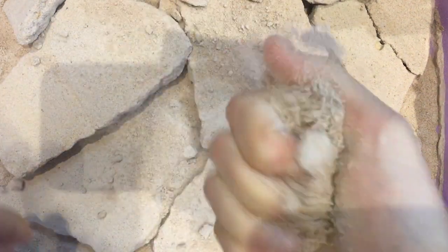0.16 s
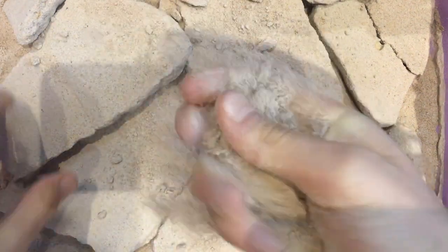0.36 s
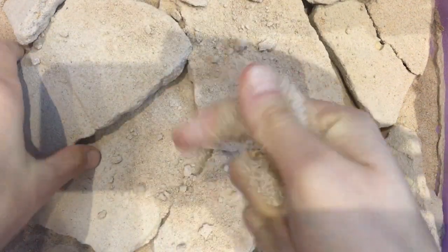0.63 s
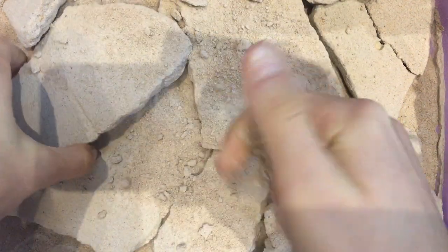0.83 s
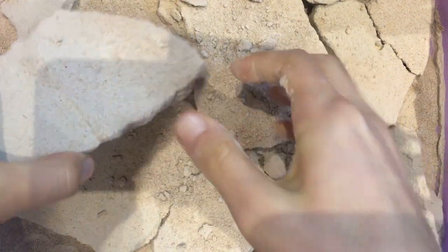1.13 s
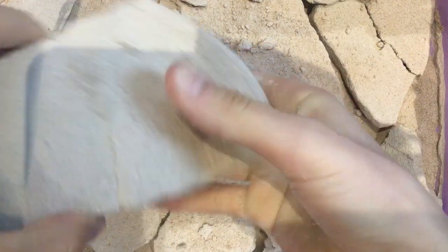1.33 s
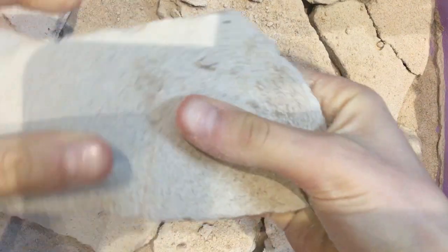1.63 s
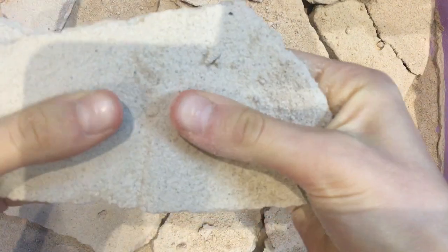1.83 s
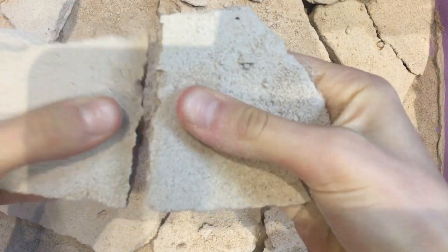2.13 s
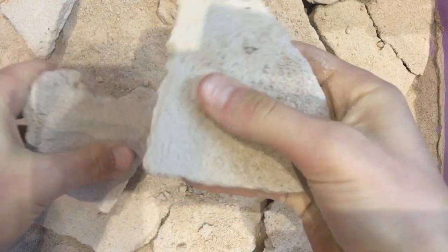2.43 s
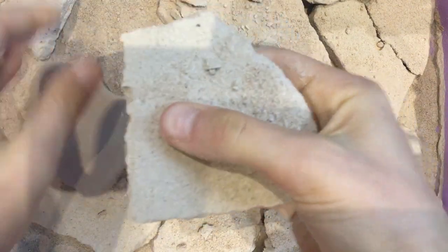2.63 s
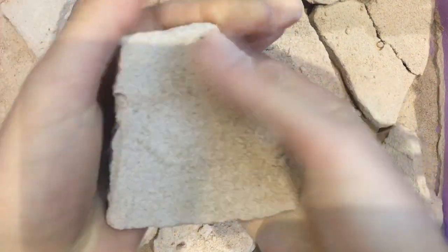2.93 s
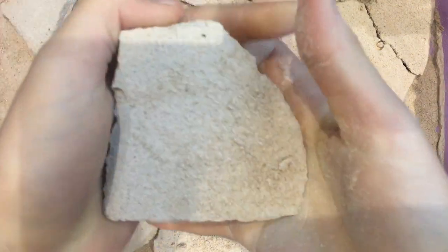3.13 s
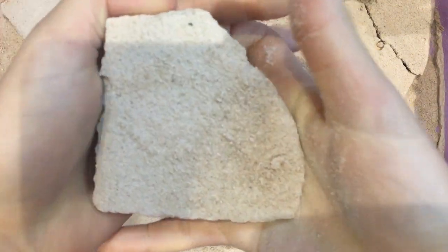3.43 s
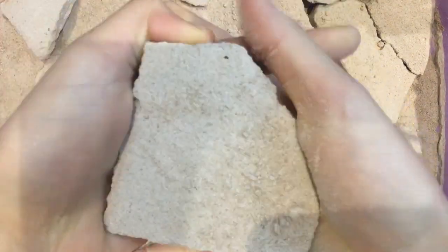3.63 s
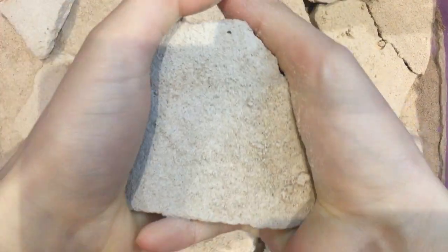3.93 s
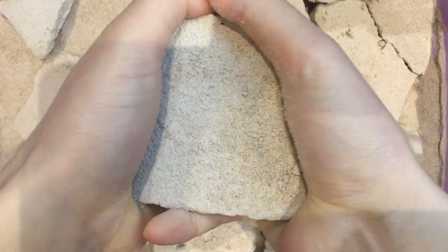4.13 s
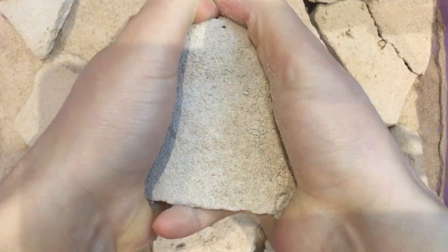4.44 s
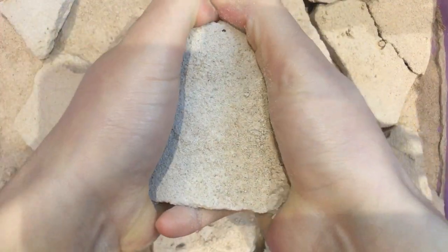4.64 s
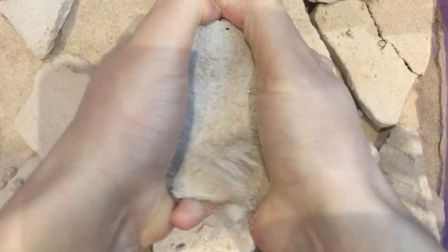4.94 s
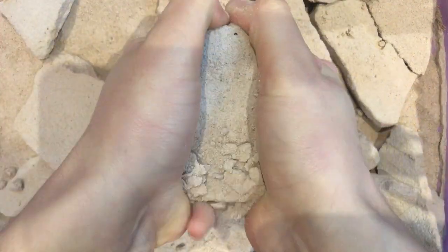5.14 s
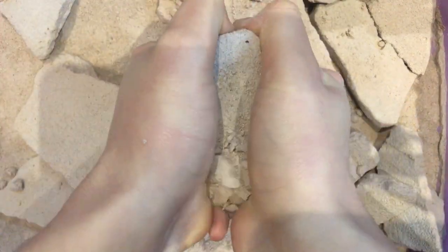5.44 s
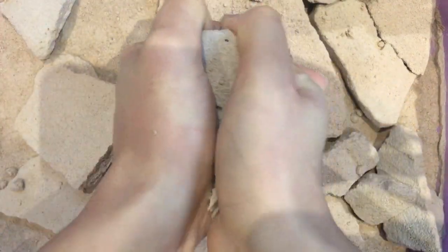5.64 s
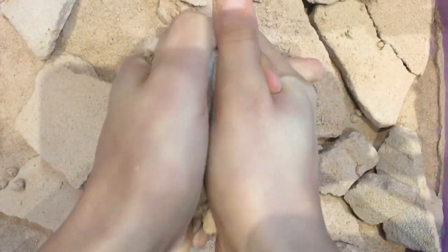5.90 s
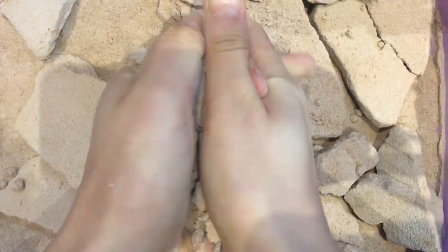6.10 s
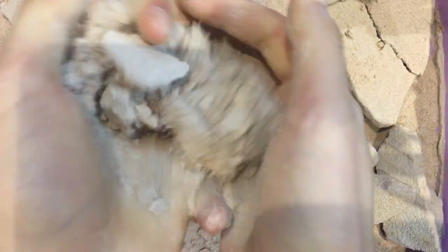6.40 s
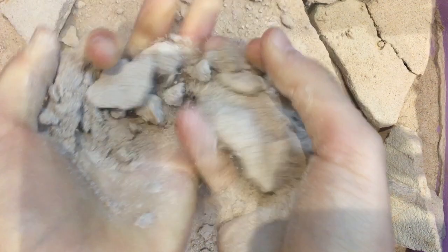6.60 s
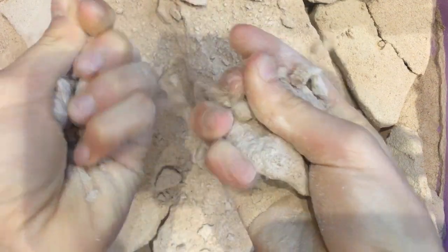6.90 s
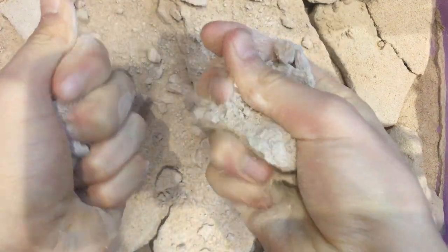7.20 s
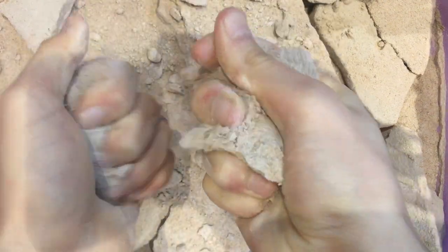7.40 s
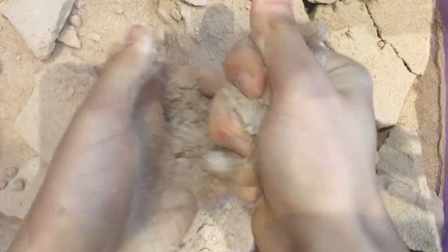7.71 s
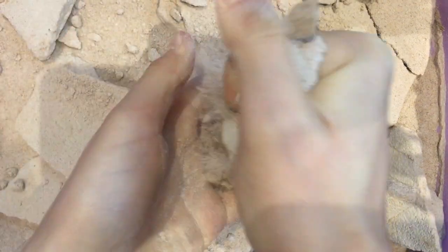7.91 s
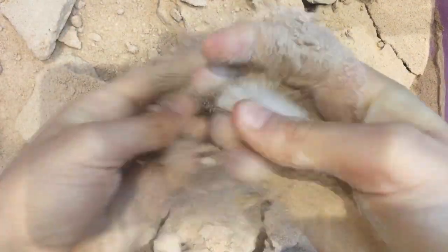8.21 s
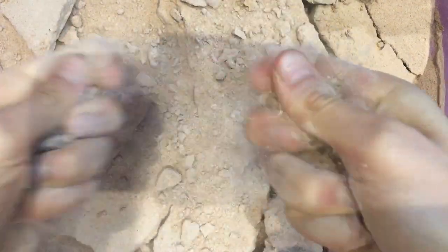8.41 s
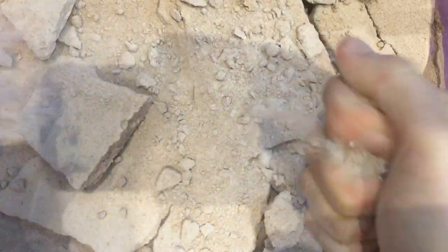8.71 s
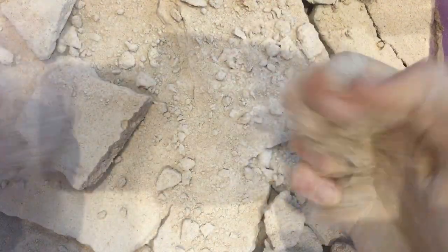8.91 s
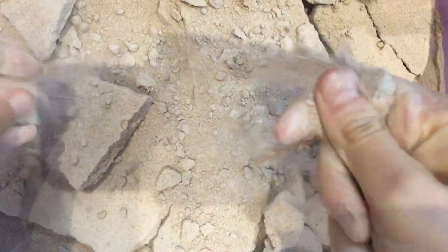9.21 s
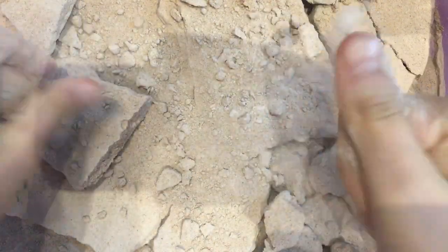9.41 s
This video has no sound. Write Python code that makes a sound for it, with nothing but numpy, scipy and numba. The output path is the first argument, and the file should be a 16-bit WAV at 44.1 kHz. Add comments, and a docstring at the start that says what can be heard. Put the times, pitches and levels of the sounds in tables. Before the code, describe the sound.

Bare hands snap and crush dry chalk slabs close up, with gritty crackles, powdery hiss, crunching clusters and hard lumps clacking onto the heap.

```python
"""A quiet place with a heap of flat chalk slabs: bare hands crush dry chalk close to the microphone.
Powder, grit and crumbs are random tiny fractures, coloured and shaped by each movement of the hands.
Cupped hands squeak as a gliding resonance and jolts thump at a falling pitch; lumps ring the heap's modes.
Snaps are short noise bursts; crunches are swelling avalanches of fractures that ring the hollow of the palms.
A low rumble wavers behind, and surfaces nearby add a faint, short reverberation."""
import sys
import numpy as np
from scipy import signal
from scipy.fft import rfft, irfft
from scipy.io import wavfile
from scipy.ndimage import uniform_filter1d
from numba import njit

SR = 44100
rng = np.random.default_rng(int(sys.argv[2]) if len(sys.argv) > 2 else 0)


def output_pcm(signal):
    """Save a mono or channel-first signal as 16-bit PCM at the path in sys.argv[1].

    Samples are clipped to [-1, 1] before scaling.
    """
    pcm = np.clip(np.atleast_2d(signal).T, -1, 1) * 32767
    wavfile.write(sys.argv[1], SR, np.round(pcm).astype(np.int16))


N = 421155
AGE = np.arange(SR // 4) / SR  # time since a blow, s


def undb(db):
    """Decibels to gain."""
    return 10 ** (np.asarray(db) / 20)


def unit(x):
    """Scale to rms 1."""
    return x / np.sqrt(np.mean(x ** 2))


def blow(x, db, size=176):
    """Scale a short sound so that its loudest 4 ms have this rms level."""
    power = uniform_filter1d(x ** 2, size, mode="constant")
    return x * undb(db) / np.sqrt(power.max())


def add(out, s, x):
    """Mix a short sound in at time s."""
    i = max(int(s * SR), 0)
    out[i:i + len(x)] += x[:max(N - i, 0)]


def colour(x, points, size=4096):
    """Causal minimum-phase filter with the given outline of (f/Hz, level/dB)."""
    hz, db = np.transpose(points)
    grid = np.maximum(np.fft.rfftfreq(size, 1 / SR), 1)
    outline_db = np.interp(np.log(grid), np.log(hz), db)
    # folding the cepstrum puts all of the response after the blow
    cepstrum = irfft(np.log(undb(outline_db)))
    cepstrum[1:size // 2] *= 2
    cepstrum[size // 2 + 1:] = 0
    response = irfft(np.exp(rfft(cepstrum)))
    return signal.fftconvolve(x, response)[:len(x)]


def walk(rate):
    """Slow chance: random levels, so many per second, joined by straight lines and scaled to rms 1."""
    steps = rng.standard_normal(N // 100)
    return unit(np.interp(np.arange(N) / SR * rate, np.arange(len(steps)), steps))


def curves(table):
    """The columns of a table of (t/s, ...) rows, sample by sample."""
    s, *columns = np.transpose(table)
    return [np.interp(np.arange(N) / SR, s, c) for c in columns]


def grains(rate, spread_db, size):
    """Tiny fractures at random moments, so many per second: many weak ones and a few strong ones."""
    hit = rng.random(size) < rate / SR
    strength = undb(spread_db * np.minimum(rng.exponential(size=size), 5))
    sign = rng.choice([-1, 1], size)
    return unit(hit * strength * sign + 1e-12)


def ring(hz, t60):
    """One struck mode, a sine that loses 60 dB in t60 seconds."""
    return np.sin(2 * np.pi * hz * AGE) * np.exp(-np.log(1000) * AGE / t60)


@njit
def resonate(x, hz, q):
    """Band-pass with a moving centre."""
    y, band, low = np.empty(len(x)), 0., 0.
    for i in range(len(x)):
        g = np.tan(np.pi * hz[i] / SR)
        v = (band + g * (x[i] - low)) / (1 + g * (g + 1 / q))
        band, low, y[i] = 2 * v - band, low + 2 * g * v, v
    return y


# tone of the quiet place: (f/Hz, level/dB)
AIR_COLOUR = [(20, -29), (35, -15.5), (52, -1), (90, -7), (200, -12), (330, -15), (550, -20), (1500, -29),
              (5000, -36.5), (15000, -51)]
AIR_DB = -71


def air():
    """A low, gently wavering background rumble with a trace of hiss: coloured noise."""
    waver_db = 1.4 * walk(rate=3.3)
    return unit(colour(rng.standard_normal(N), AIR_COLOUR)) * undb(AIR_DB + waver_db)


ROOM_T60_S, ROOM_DB = .26, -16.0206


def room(x):
    """A faint, short reverberation from the surfaces nearby: a decaying noise tail."""
    decay = np.exp(-np.log(1000) * AGE / ROOM_T60_S)
    tail = rng.standard_normal(len(AGE)) * decay * (AGE > .003)
    tail = colour(tail, [(100, -11.0), (400, -4.0), (1500, -6), (5000, -7.5), (15000, -8.5)])
    tail = tail / np.sqrt(np.sum(tail ** 2))
    return x + undb(ROOM_DB) * signal.fftconvolve(x, tail)[:N]


# every stroke builds up, eases as the chalk yields, and dies away
ATTACK_S, SAG_DB_PER_S, RELEASE_S = 0.013, 14.5, 0.025


def stroke(start, length, sag):
    """Gain of one movement of the hand: a rounded swell, a hold that sags by so many dB per s, a release."""
    age = np.arange(int((length + 8 * RELEASE_S) * SR)) / SR
    swell = 1 - np.exp(-(age / ATTACK_S) ** 2)
    release = np.exp(-np.maximum(age - length, 0) / RELEASE_S)
    gain = swell * undb(-sag * age) * release
    return np.pad(gain, (max(int(start * SR), 0), N))[:N]


def strokes(rows, sag=SAG_DB_PER_S):
    """Joint gain of movements given as (start t/s, length t/s, level/dB); they add in power."""
    return np.sqrt(sum((undb(db) * stroke(start, length, sag)) ** 2 for start, length, db in rows))


def ticks(pitches, rate, q):
    """Bits of chalk land at random moments, each size at its own pitch."""
    sizes = (resonate(grains(rate=rate, spread_db=0.5, size=N), np.full(N, 1. * hz), q) for hz in pitches)
    return unit(sum(sizes))


# loose chalk that keeps trickling between the strokes: (t/s, powder level/dB, grit level/dB)
TRICKLE_LEVELS = [(0, -63.5, -62.5), (.22, -64.5, -65), (.36, -72.5, -69.5), (.8, -67, -69.5),
                  (.88, -72.5, -71.5), (1.25, -78.5, -79.5), (1.7, -69.5, -75), (1.9, -83, -81),
                  (2.15, -78.5, -79), (3.2, -71.5, -84.5), (3.98, -76, -85), (4.9, -72, -80),
                  (5.7, -72.5, -70.5), (6.5, -63.5, -68), (7.5, -59.5, -78), (8.2, -66.5, -67),
                  (8.6, -60, -67), (9.05, -66, -62.5), (9.55, -57.5, -62.5)]
# a hand rubs or squeezes the chalk: (start t/s, length t/s, powder level/dB, grit level/dB)
HAND_RUBS = [(0.03, 0.19, -59, -81), (0.448, 0.069, -62, -74), (0.567, 0.18, -60.5, -66),
             (0.94, .11, -64.5, -62), (1.398, .11, -64.5, -68), (1.531, 0.091, -65.5, -70.5),
             (1.632, 0.021, -57, -63), (1.785, 0.029, -66, -75), (1.955, 0.053, -72, -77),
             (2.26, 0.032, -70, -82), (2.367, 0.091, -66.5, -73), (2.55, 0.072, -65, -78),
             (2.655, 0.015, -64, -67.5), (2.88, .12, -64.5, -75), (3.068, 0.035, -63, -76),
             (3.302, 0.03, -71, -71), (3.614, 0.035, -56, -69), (3.641, 0.029, -49, -62.5),
             (3.798, 0.066, -67, -81), (4.05, 0.12, -71, -84), (4.427, 0.025, -56.5, -64),
             (4.575, 0.058, -63, -76), (4.942, 0.11, -59, -59.5), (5.256, 0.25, -58.5, -61.5),
             (5.524, 0.059, -54.5, -49.5), (5.828, 0.12, -59.5, -59.5), (6.147, .035, -53.5, -65),
             (6.198, 0.044, -59, -61.5), (6.295, 0.071, -80, -62.5), (6.6, 0.41, -72, -68),
             (6.921, 0.14, -54, -55.5), (7.078, .08, -60, -63), (7.152, 0.14, -51, -54.5),
             (7.29, 0.24, -61, -58), (7.739, 0.16, -55, -54), (8.064, 0.012, -51.5, -62),
             (8.276, 0.051, -56, -60), (8.34, 0.11, -52.5, -56.5), (8.484, 0.26, -51.5, -57),
             (8.694, 0.055, -49, -56.5), (8.762, 0.13, -55.5, -66), (8.903, 0.045, -58.5, -61),
             (9.147, 0.11, -53, -58), (9.32, 0.11, -58, -75)]
# a handful of crumbs tumbles out: (start t/s, length t/s, level/dB)
CRUMB_SPILLS = [(0.0, 0.27, -63.5), (.39, 0.46, -66.5), (.945, .13, -57.5), (1.1, 0.36, -71.5),
                (2.55, 0.3, -71.5), (3.315, 0.018, -81), (5.86, .07, -67), (6.35, 0.031, -55.5),
                (6.59, .25, -63), (7.87, 0.11, -62), (8.26, 0.11, -57.5), (9.0, 0.045, -61)]
# tone of hissing powder, of crackling grit and of tumbling crumbs: (f/Hz, level/dB)
POWDER_COLOUR = [(1500, -46.5), (3000, -6.5), (4000, -1.5), (4800, -4), (6300, 0.5), (7300, -2), (9000, 2),
                 (10400, -3), (11800, -1), (13500, -4), (15600, -10)]
GRIT_COLOUR = [(400, -18), (780, -4.5), (1080, 5), (1500, 3.5), (1950, 4), (2450, 5.5), (2900, 0.5),
               (3700, 0.5), (5000, -6), (9000, -41.5)]
CRUMB_COLOUR = [(40, -22), (80, 3.5), (135, 6), (220, 5.5), (340, -1.5), (450, 2.5), (700, 0), (1050, -5),
                (1600, -20), (3000, -60)]
SHED_DB = -8.5  # crumbs that any rubbing sheds, relative to its grit


def grinding(stray_db=-7, clatter_db=-6, catch_db=3.0):
    """Chalk rubs on chalk and skin: powder hisses, grit crackles, crumbs tumble; all catch and slip together."""
    powder_db, grit_db = curves(TRICKLE_LEVELS)
    powder_gain = np.hypot(undb(powder_db), strokes((s, length, db) for s, length, db, _ in HAND_RUBS))
    grit_gain = np.hypot(undb(grit_db), strokes((s, length, db) for s, length, _, db in HAND_RUBS))
    crumb_gain = np.hypot(undb(SHED_DB) * grit_gain, strokes(CRUMB_SPILLS))
    # gritty rubbing catches and slips; skin on powder slides evenly
    grit_share = grit_gain / np.hypot(grit_gain, powder_gain)
    slip = undb(catch_db * walk(rate=60) * grit_share)
    fractures = grains(rate=1400, spread_db=5.5, size=N)
    dust = grains(rate=14000, spread_db=2.5, size=N)
    grit_grains = grains(rate=2000, spread_db=1.5, size=N)
    powder = unit(colour(dust + 0.4 * fractures, POWDER_COLOUR))
    grit = unit(colour(0.25 * fractures + grit_grains, GRIT_COLOUR))
    crumbs = unit(colour(grains(rate=450, spread_db=3.5, size=N), CRUMB_COLOUR))
    # stray bits tick on the slabs and bigger ones clatter
    grit = unit(grit + undb(stray_db) * ticks((1320, 2270, 3080, 6030), rate=12, q=5.2))
    crumbs = unit(crumbs + undb(clatter_db) * ticks((310, 435, 960, 1420), rate=14, q=9.3))
    return slip * (powder * powder_gain + grit * grit_gain + crumbs * crumb_gain)


# dry skin squeaks on the chalk, pitched by the hollow of the hands:
# (start t/s, length t/s, first f/Hz, last f/Hz, level/dB)
SKIN_SQUEAKS = [(0.51, .2, 1180, 1110, -71), (1.134, 0.32, 1380, 1490, -79), (3.35, 0.083, 1890, 1890, -79),
                (3.633, 0.041, 1800, 1720, -60.5), (4.304, 0.022, 1200, 1160, -71),
                (4.43, 0.044, 1150, 1140, -74), (4.588, .015, 1150, 1150, -69),
                (5.31, 0.086, 2210, 2320, -65), (6.298, .07, 2160, 1430, -66),
                (6.542, .39, 1335, 1280, -66.5), (8.485, 0.071, 2480, 2450, -56),
                (9.168, 0.053, 2510, 2480, -56)]
SQUEAK_Q, SQUEAK_WOBBLE, SQUEAK_FLUTTER_DB = 16., .015, 1.2  # wobble: rms share of the pitch


def squeaks(overtone=2.4, overtone_db=-8):
    """Cupped hands pick an unsteady, gliding pitch and its overtone out of the grit while the skin slides."""
    points = []
    for s, length, first_hz, last_hz, _ in SKIN_SQUEAKS:
        points += [(s, first_hz), (s + length, last_hz)]
    glide_hz, = curves(points)
    pitch = glide_hz * np.exp(SQUEAK_WOBBLE * walk(rate=25))
    grit = grains(rate=4000, spread_db=2.0, size=N)
    low = unit(resonate(colour(grit, GRIT_COLOUR), pitch, SQUEAK_Q))
    high = unit(resonate(grit, overtone * pitch, SQUEAK_Q))
    hollow = unit(low + undb(overtone_db) * high)
    gain = strokes([(s, length, db) for s, length, _, _, db in SKIN_SQUEAKS], sag=0)
    return hollow * undb(SQUEAK_FLUTTER_DB * walk(rate=36)) * gain


# dull jolts of hands and slab: (t/s, level/dB, f/Hz)
JOLTS = [(1.051, -56, 69), (1.944, -53.5, 67.6), (2.545, -50, 136.5), (2.732, -43, 131), (2.736, -42, 71),
         (2.771, -43.5, 62.4), (2.812, -43.5, 133), (4.61, -50.5, 55.7), (4.815, -41, 56.7),
         (4.966, -42.5, 59.3), (5.033, -42.5, 52.5), (5.082, -49, 59), (5.258, -45, 60.3),
         (5.28, -44.5, 60.7), (5.298, -46, 61), (5.532, -49, 111), (5.541, -43, 98), (5.582, -46.5, 55.6),
         (6.366, -52, 68), (6.72, -56.5, 81.5), (7.689, -52.5, 103), (8.409, -56, 89), (9.54, -52, 124)]
THUMP_T60_S_PER_HZ = 0.0014  # a firmer grip thumps higher and rings longer


def thumps(stiffening=3.23, relax_s=0.0018, flesh_db=-9, flesh_s=0.012):
    """Flesh stiffens under a jolt and relaxes, so each thump falls quickly to its pitch."""
    out = np.zeros(N)
    flesh_colour = [(40, -6), (130, 12), (280, -6), (600, -35.0), (2000, -44)]
    for s, db, hz in JOLTS:
        t60 = THUMP_T60_S_PER_HZ * hz
        turns = hz * (AGE + stiffening * relax_s * (1 - np.exp(-AGE / relax_s)))
        swing = np.sin(2 * np.pi * turns) * np.exp(-np.log(1000) * AGE / t60)
        flesh = colour(rng.standard_normal(len(AGE)) * np.exp(-AGE / flesh_s), flesh_colour)
        add(out, s - .0005, blow(swing, db) + blow(flesh, db + flesh_db))
    return out


# modes of the heap of slabs: (f/Hz, level/dB, t60 t/s)
SLAB_MODES = [(87, -3, 0.33), (152, -2, 0.13), (222.6, 1, 0.21), (301, 4.5, 0.039), (431.4, 11, 0.059),
              (507, 9.5, 0.027), (615, 5, 0.014), (637, 2, 0.069), (905, 8, 0.03), (1074, -3.5, 0.055),
              (1296, -4, 0.073), (1462, -7.5, 0.042), (1410, 0, 0.02), (1605, 11.5, 0.0097),
              (1705, -2, 0.07), (1985, 8, 0.03), (2185, -7, 0.022), (2760, 15, 0.0078), (3320, -8, 0.048),
              (3230, -6, 0.013), (3780, 7, 0.026), (4360, -5, 0.02)]


def heap(centre_hz, octaves):
    """The slabs ring in the modes near the pitch that a blow favours."""
    out = np.zeros(len(AGE))
    for k, (hz, db, t60) in enumerate(SLAB_MODES):
        nearness = np.exp(-(np.log2(hz / centre_hz) / octaves) ** 2 / 2)
        out += (-1) ** k * undb(db) * nearness * ring(hz, t60)
    return out


# lumps land on the slabs: (t/s, clack level/dB, thud level/dB, thud f/Hz, clack f/Hz, contact decay t/s)
LUMP_KNOCKS = [(0.034, -37, -49.5, 483, 1500, 0.0022), (0.0706, -51, -71, 150, 1378, 0.003),
               (0.3972, -59, -57.5, 430, 899, 0.0037), (0.4842, -54, -61, 480, 1070, 0.003),
               (0.5353, -41, -78, 480, 1610, 0.0015), (0.9213, -51, -56, 147, 1810, 0.0023),
               (0.9705, -59, -52.5, 441, 1162, 0.003), (1.0132, -63, -52, 425, 1480, 0.0038),
               (6.492, -54, -68, 161, 1410, 0.0048), (6.6653, -54, -62, 242, 2336, 0.0027),
               (6.7424, -52.5, -79, 366, 990, 0.003), (7.3592, -33.5, -41, 420, 890, 0.005),
               (7.5481, -44.5, -59, 226, 960, 0.0057), (7.8093, -22, -36, 209, 2840, 0.0066),
               (7.8304, -30, -25, 223, 1050, 0.0046), (7.8827, -28.5, -40.5, 231, 1060, 0.0033),
               (8.255, -46.5, -61, 480, 1523, 0.0022), (8.275, -47.5, -64, 139, 845, 0.0018),
               (8.3574, -35.5, -47.5, 446, 900, 0.0048), (9.0256, -48, -57, 242, 880, 0.003),
               (9.3548, -35, -75, 333, 1650, 0.0026), (9.538, -48.5, -47.5, 392, 940, 0.0027)]
# tone of the contact and of the chips it sheds: (f/Hz, level/dB)
CLACK_COLOUR = [(250, -36), (500, 3), (740, -6.5), (950, 5.5), (1400, 10), (2100, 1), (3000, 1.5),
                (4400, -2), (5200, -46), (9000, -52)]
CHIP_COLOUR = [(3000, 3), (5200, 7), (7500, 3), (10000, -1.5), (15500, -13)]
CHIP_DB, CHIP_DB_PER_OCTAVE = -13, 1  # chips relative to a clack at 1 kHz; a higher clack sheds more


def knocks(front=6.7, crack_db=-3.5, ring_db=-4, scatter=0.029, scatter_s=0.09):
    """A lump cracks against the slabs, sheds chips and sets the heap ringing, with a thud underneath."""
    out = np.zeros(N)
    for s, clack_db, thud_db, thud_hz, clack_hz, decay in LUMP_KNOCKS:
        chip_db = clack_db + CHIP_DB + CHIP_DB_PER_OCTAVE * np.log2(clack_hz / 1000)
        contact = rng.standard_normal(len(AGE))
        contact[0] += front
        fade = np.exp(-AGE / decay) + scatter * np.exp(-AGE / scatter_s)
        crack = colour(contact * fade, CLACK_COLOUR)
        chips = colour(contact * np.exp(-AGE / (0.71 * decay)), CHIP_COLOUR)
        clack = blow(crack, clack_db + crack_db) + blow(heap(clack_hz, octaves=0.44), clack_db + ring_db)
        thud = blow(heap(thud_hz, octaves=0.74), thud_db)
        add(out, s, clack + blow(chips, chip_db) + thud)
    return out


# brittle snaps: (t/s, crack level/dB, splinter level/dB)
BRITTLE_SNAPS = [(0.3074, -51, -50), (0.894, -55, -53.5), (1.2045, -75, -71), (1.2993, -66, -65.5),
                 (1.466, -58.8, -60), (2.051, -78, -69), (2.329, -63.9, -84),          (2.7792, -53, -50),
                 (2.7964, -56.5, -47), (4.1186, -55.5, -65), (4.535, -66, -77), (4.5828, -46, -34),
                 (5.4807, -57, -56), (5.9987, -39, -40), (7.0478, -51, -46), (7.0912, -47, -47.5),
                 (7.6285, -42, -45), (7.8318, -29.5, -51), (7.8819, -42, -51), (8.548, -40.5, -51),
                 (8.7431, -51, -35), (8.827, -59, -52.5), (8.9788, -72, -52.5), (9.114, -49, -73)]
# tone of the crack and of its splinters: (f/Hz, level/dB)
CRACK_COLOUR = [(80, -43), (250, -2), (450, 7.5), (780, -2), (1250, 7.5), (2400, 10), (4000, 8.5),
                (5200, -4), (7500, -7)]
SPLINTER_COLOUR = [(2500, -66), (4200, -5), (5000, -3.5), (6800, 2), (8900, 3), (10300, -2), (12000, -0.5),
                   (15500, -12)]
SNAP_DECAY_S = 0.002


def snaps(echo_s=0.0019, echo=0.27, front=6.3):
    """A crack runs through in one step, the slabs nearby throw back a faint second click, and its spray of
    fractures dies within ms."""
    out = np.zeros(N)
    for s, crack_db, splinter_db in BRITTLE_SNAPS:
        burst = rng.standard_normal(len(AGE)) * np.exp(-AGE / SNAP_DECAY_S)
        burst[0] += front
        burst[int(echo_s * SR)] -= front * echo
        crack = blow(colour(burst, CRACK_COLOUR), crack_db)
        splinters = blow(colour(burst, SPLINTER_COLOUR), splinter_db)
        add(out, s, crack + splinters)
    return out


# the chalk gives way under a palm, or grinds as a slab is set down: (t/s, grit level/dB, powder level/dB,
# hollow level/dB, hollow f/Hz)
PALM_CRUNCHES = [(1.945, -60.5, -56, -66, 620), (2.542, -65, -59, -48, 416), (2.55, -59.5, -57, -63, 620),
                 (2.575, -71, -70, -62, 1200), (2.726, -47.5, -49.5, -43, 475), (2.732, -66, -47, -42, 465),
                 (4.442, -62.5, -56, -73, 1110), (4.604, -65, -52.5, -56.5, 1180),
                 (4.81, -50.5, -44.5, -46, 1164), (4.963, -42.5, -43.5, -47, 670),
                 (5.026, -47, -46.5, -42.5, 626), (5.079, -50.5, -49, -65, 550),
                 (5.252, -53.5, -49, -55, 1060), (5.278, -50.5, -51, -46, 436), (5.295, -42, -45, -50, 483),
                 (5.363, -50.5, -51.5, -78, 1399), (5.528, -44.5, -48.5, -61, 662),
                 (5.539, -39, -43, -42.5, 624), (5.578, -43, -48, -57, 1250), (5.588, -46, -47, -49, 450),
                 (7.208, -46.5, -44, -50, 1200), (7.63, -44.5, -47, -47, 500), (7.685, -45, -41, -48, 1090),
                 (8.409, -47, -41, -56, 1020), (8.502, -40.5, -44.5, -45.5, 413),
                 (8.617, -45.5, -62, -53, 470), (8.727, -47, -48, -53, 425), (9.181, -52, -55, -48, 483),
                 (9.204, -43, -61, -53, 1115)]
CRUNCH_SWELL_S = .003
HOLLOW_REF_HZ = 720  # pitch at which the hollow rings for hollow_t60; a tighter, higher one rings longer


def crunches(hollow_t60=0.016, spill=0.29, spill_s=0.019, creak_db=-14, creak_s=0.0064):
    """An avalanche of fractures swells and dies, spilling powder; the hollow between the palms rings."""
    out = np.zeros(N)
    u = AGE / CRUNCH_SWELL_S
    swell = u ** 2 * np.exp(2 * (1 - u)) + spill * np.minimum(u, 1) * np.exp(-AGE / spill_s)
    for s, grit_db, powder_db, hollow_db, hollow_hz in PALM_CRUNCHES:
        burst = grains(rate=6800, spread_db=0.5, size=len(AGE)) * swell
        cavity = ring(hollow_hz, hollow_t60 * hollow_hz / HOLLOW_REF_HZ)
        hollow = blow(signal.fftconvolve(burst, cavity)[:len(AGE)], hollow_db)
        grit = blow(colour(burst, GRIT_COLOUR), grit_db)
        powder = blow(colour(burst, POWDER_COLOUR), powder_db)
        add(out, s - .0008, grit + powder + hollow)
        # the first grains yield just before the rest
        first = grains(rate=6000, spread_db=3.5, size=len(AGE))
        creak = first * np.exp((AGE - AGE[-1]) / creak_s)
        add(out, s - AGE[-1], blow(colour(creak, POWDER_COLOUR), powder_db + creak_db))
    return out


def scene():
    """All the chalk sounds in their space, over the background."""
    chalk = grinding() + squeaks() + thumps() + knocks() + snaps() + crunches()
    return (air() + room(chalk))[None]


TOP_HZ = 16050


def record(dry):
    """The microphone drops the deepest bass; the recorder cuts the top."""
    thin = signal.sosfilt(signal.butter(2, 34, "high", fs=SR, output="sos"), dry)
    return signal.sosfilt(signal.ellip(10, .2, 70, TOP_HZ, fs=SR, output="sos"), thin)


dry = scene()
out = record(dry)
output_pcm(out)
```